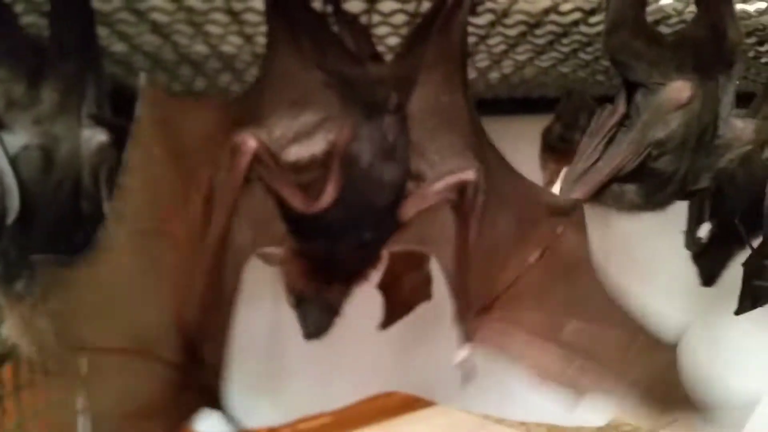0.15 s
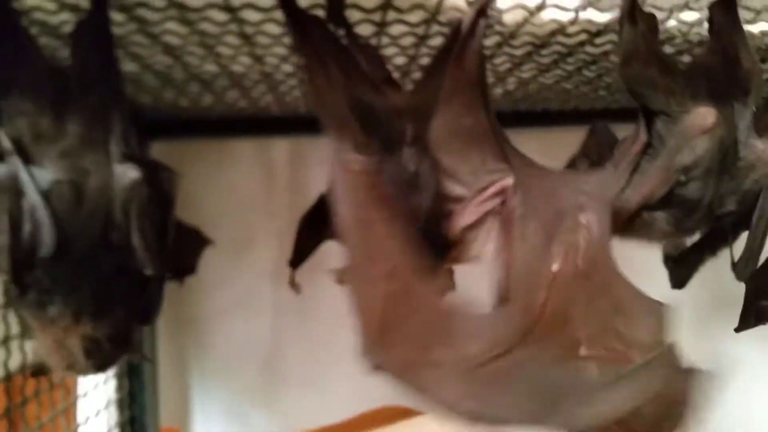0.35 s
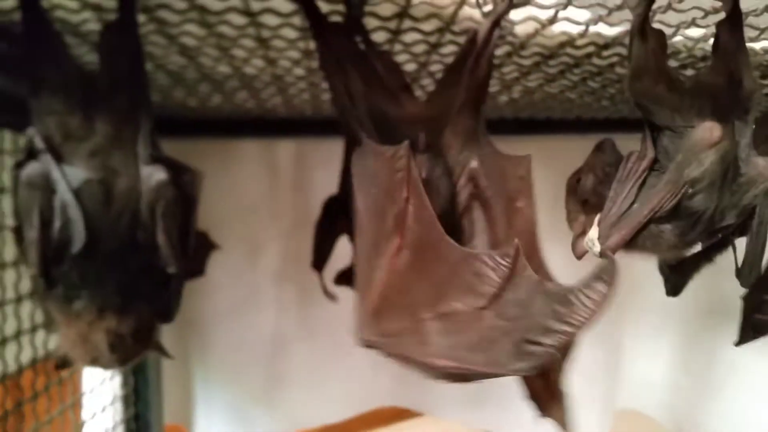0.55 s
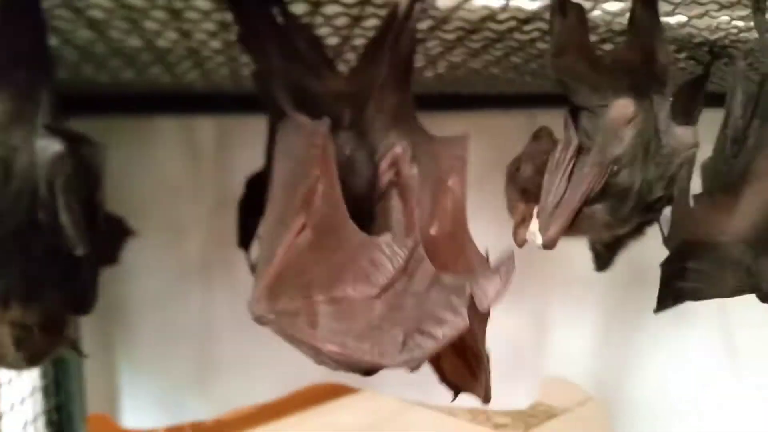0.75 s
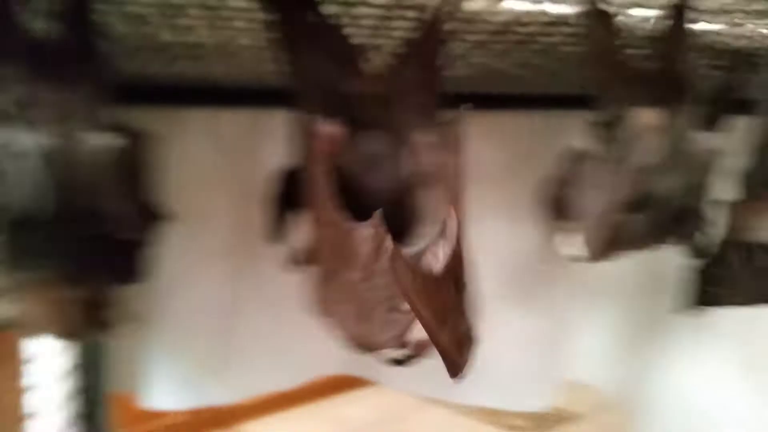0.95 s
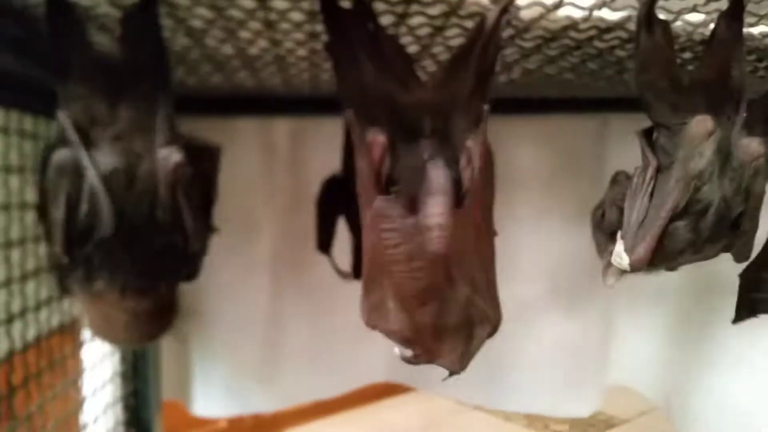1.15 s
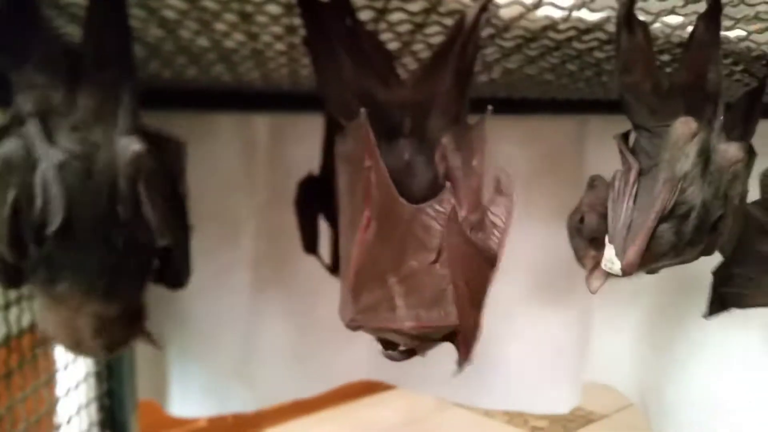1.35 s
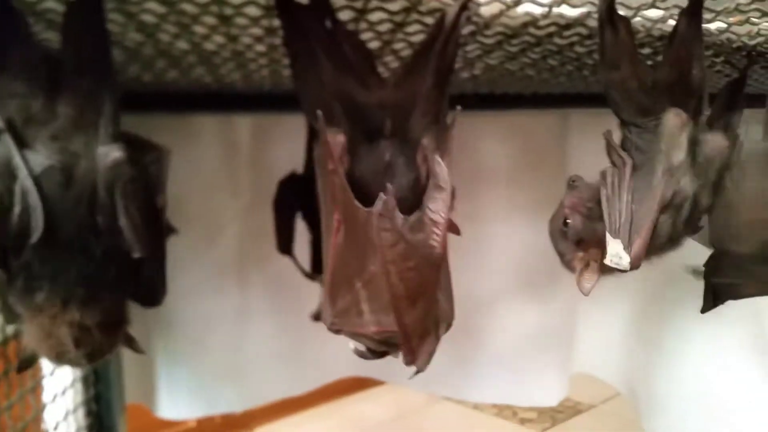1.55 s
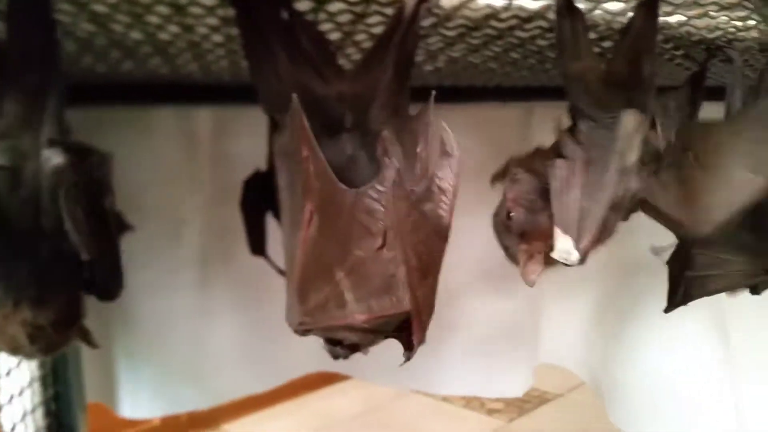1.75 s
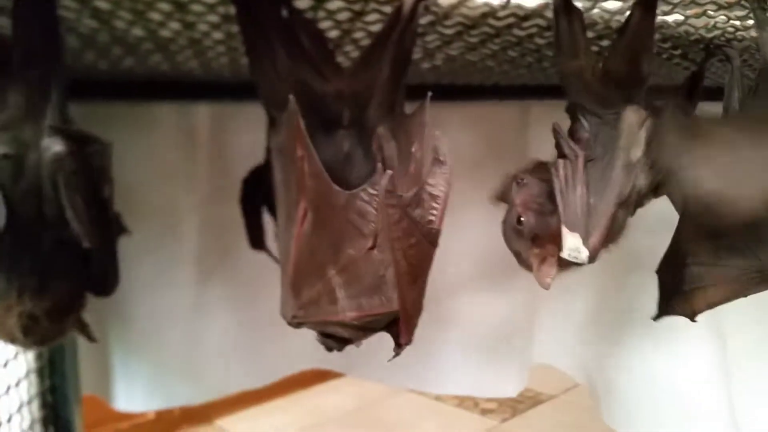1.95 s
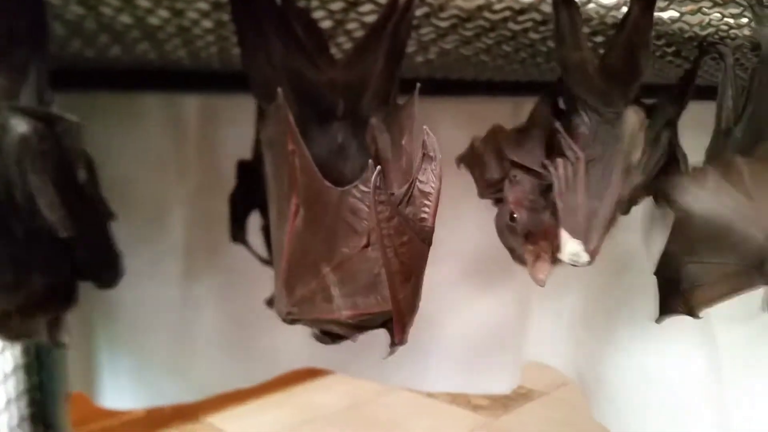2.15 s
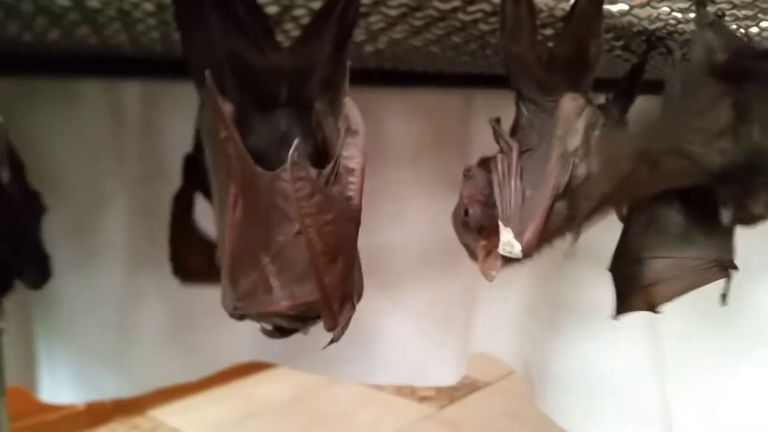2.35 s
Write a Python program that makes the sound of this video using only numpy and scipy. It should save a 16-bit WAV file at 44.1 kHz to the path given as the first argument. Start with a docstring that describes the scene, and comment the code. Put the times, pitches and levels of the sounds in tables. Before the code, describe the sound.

Fruit bats screech in rapid, harsh, high-pitched syllables from about 0.2 to 0.8 seconds. Shorter bursts come near 1.0 and 1.3 seconds. A wing swishes through the latter and snaps at 1.5 seconds, and the wire cage rings faintly. Another fast run of chatter lasts from 1.7 to 2.2 seconds, then one tiny chirp at 2.4. Quiet ventilation hums throughout in the small, hard-walled enclosure.

```python
"""Fruit bats squabble under the mesh roof of a small, hard-walled enclosure; ventilation hums throughout.
At 0.23, 1.01 and 1.34 s a dry rasp opens a bout of screeching: rough, fast vocal-fold pulses through
two throat resonances near 6 and 11 kHz that arch as the mouth opens. A wing swishes through the third
bout and snaps at 1.49 s; the cage rings faintly. A fourth bout runs from 1.7 to 2.2 s at about
21 syllables a second. One short chirp follows at 2.38 s."""
import sys
import numpy as np
from scipy import signal
from scipy.fft import rfft, irfft
from scipy.io import wavfile

SR = 44100
rng = np.random.default_rng(int(sys.argv[2]) if len(sys.argv) > 2 else 0)


def int16_out(signal):
    """Quantize to a 16-bit WAV file."""
    q = np.round(np.clip(np.atleast_2d(signal).T, -1, 1) * 32767)
    wavfile.write(sys.argv[1], SR, q.astype(np.int16))


N = 105840
BAND_EDGE_HZ = 16150
SNAP_S = 1.493


def amp(db):
    """Decibels to gain."""
    return 10 ** (np.asarray(db) / 20)


def unit(x):
    """Scale to rms 1."""
    return x / np.sqrt(np.mean(x ** 2) + 1e-20)


def lookup(points, hz):
    """Interpolate a table on a log-frequency axis."""
    points_hz, values = np.transpose(points)
    return np.interp(np.log(hz + 1), np.log(points_hz + 1), values)


def colour(x, spectrum):
    """Filter by a spectrum table; output rms 1."""
    gain = amp(lookup(spectrum, np.fft.rfftfreq(x.shape[-1], 1 / SR)))
    return unit(irfft(rfft(x) * gain, x.shape[-1]))


def noise(size):
    """White noise."""
    return np.random.default_rng(rng.integers(1 << 30)).standard_normal(size)


def wander(size, cutoff_hz):
    """Low-passed random drift, rms about 1."""
    span = max(size, 8192)
    rolloff = 1 + (np.fft.rfftfreq(span, 1 / SR) / cutoff_hz) ** 4
    return unit(irfft(rfft(noise(span)) / rolloff, span))[:size]


def formant(x, centre_hz, width_hz):
    """Two moving resonators in series, then a high-pass; output rms 1."""
    carrier = np.exp(2j * np.pi * np.cumsum(centre_hz) / SR)
    pole = np.exp(-np.pi * width_hz / SR)
    for _ in range(2):
        x = 2 * (carrier * signal.lfilter([1 - pole], [1, -pole], x / carrier)).real
    highpass = signal.butter(2, 0.5 * np.min(centre_hz), "high", fs=SR, output="sos")
    return unit(signal.sosfilt(highpass, x))


def place(mix, start_s, sound, pan_db):
    """Add a call with time and level differences between channels; positive pan is left."""
    # caller directions: from_s, left_lead_ms
    directions = [(0, -0.43), (.95, 0.42), (1.65, -0.052)]
    lead_ms = directions[sum(start_s > from_s for from_s, _ in directions[1:])][1]
    for channel, side in zip(mix, (1, -1)):
        onset = round((start_s - side * lead_ms / 2000) * SR)
        part = channel[onset:onset + len(sound)]
        part += amp(side * pan_db / 2) * sound[:len(part)]


def ventilation():
    """Steady rush of air with faint, wavering motor tones."""
    # air spectrum: freq_hz, gain_db
    air_spectrum = [(20, -16), (45, -5), (100, -2), (200, -1), (300, -4), (450, -9), (600, -2), (820, -8),
                    (1100, -16), (1700, -15), (2400, -16), (3200, -24), (4400, -29), (6500, -35),
                    (11000, -39), (16000, -40)]
    # left-right likeness of the air: freq_hz, coherence
    air_coherence = [(40, 1), (150, 0.91), (350, 0.93), (700, 0.74), (1300, 0.28), (16000, .1)]
    # motor tones: pitch_hz, level_db
    motor_tones = [(100, -64.5), (199.5, -65.5), (614, -69.5), (795.5, -62)]
    left, independent = rfft(rng.standard_normal((2, N)))
    coherence = lookup(air_coherence, np.fft.rfftfreq(N, 1 / SR))
    right = coherence * left + np.sqrt(1 - coherence ** 2) * independent
    rush = colour(irfft(np.array([left, right]), N), air_spectrum)
    hum = np.zeros(N)
    for pitch_hz, level_db in motor_tones:
        phase = 2 * np.pi * np.cumsum(pitch_hz + 0.71 * wander(N, 7.6)) / SR
        hum += amp(level_db) * unit(np.sin(phase) * (1 + 0.1 * wander(N, 1.7)))
    return amp(-48) * rush + hum


def room(x):
    """Near reflections from mesh roof and wall, then a diffuse tail."""
    # reverberation time: freq_hz, t60_s
    decay_times = [(300, 0.18), (3000, 0.52), (6000, 0.31), (10000, 0.33), (15000, 0.17)]
    size, build_s, echo_count = SR // 2, 0.0032, 24
    hz, t, bins = signal.stft(rng.standard_normal((4, size)), SR, nperseg=256)
    decay = amp(-60 * t / lookup(decay_times, hz)[:, None])
    tails = signal.istft(bins * decay * (1 - np.exp(-t / build_s)), SR, nperseg=256)[1]
    tails /= np.linalg.norm(tails, axis=1, keepdims=True)
    echoes = np.zeros((2, size))
    for channel in echoes:
        signs = rng.choice([-1, 1], size=echo_count)
        delays_s = rng.uniform(0.0005, 0.008, size=echo_count)
        channel[(SR * delays_s).astype(int)] = signs / np.sqrt(echo_count)
    early = signal.fftconvolve(x, echoes, axes=1)[:, :N]
    same_side = signal.fftconvolve(x, tails[:2], axes=1)[:, :N]
    crossed = signal.fftconvolve(x[::-1], tails[2:], axes=1)[:, :N]
    return early + amp(1) * (same_side + 0.29 * crossed)


def cage():
    """The wire cage rings faintly as the wing snaps."""
    # wire modes: freq_hz, level_db, t60_s
    modes = [(955, -31, 0.11), (1200, -43.5, 0.18), (1640, -31.5, 0.044), (2590, -51, 0.3)]
    t = np.maximum(np.arange(N) / SR - SNAP_S, 0)
    return sum(amp(db - 60 * t / t60_s) * np.sin(2 * np.pi * hz * t) for hz, db, t60_s in modes)


def wing():
    """A swish falling in pitch, and the snap of the membrane pulling taut."""
    # swish path: time_s, centre_hz, level_db
    swish_path = [(1.26, 4120, -94), (1.312, 3050, -42), (1.36, 2530, -42), (1.401, 2150, -40.5),
                  (1.46, 1680, -42.5), (1.50, 1270, -49), (1.56, 940, -92), (1.64, 769, -83)]
    # membrane snap: freq_hz, gain_db
    snap_spectrum = [(40, -26), (250, -1), (600, 9), (1000, -6), (1600, -7), (2700, -12), (4000, -12),
                     (9000, -26)]
    snap_decay_s = 0.0034
    t = np.arange(N) / SR
    time_s, centre_hz, level_db = np.transpose(swish_path)
    glide_hz = np.interp(t, time_s, centre_hz)
    envelope = amp(np.interp(t, time_s, level_db, left=-120, right=-120))
    swish = np.array([formant(noise(N), glide_hz, width_hz=2400) for _ in range(2)])
    snap = colour(noise(N), snap_spectrum) * (t > SNAP_S) * np.exp(-abs(t - SNAP_S) / snap_decay_s)
    return envelope * swish + amp(-26) * snap


def effort_arch(length_s):
    """Vocal effort: 0 to 1 and back, peaking early."""
    progress = np.arange(0, length_s, 1 / SR) / length_s
    return abs(np.sin(np.pi * progress ** 0.72))


def vocal_folds(effort, pulse_hz):
    """Uneven pulses, each with a puff of air; the rate sags at low effort."""
    sag, jitter, shimmer_db = 0.04, 0.0268, 2
    air_share, puff_cycles = 0.53, 0.12
    size = len(effort)
    rate_hz = pulse_hz * (1 - sag * (1 - effort) + jitter * wander(size, 415))
    cycles = np.cumsum(rate_hz) / SR
    clicks = sum(np.cos(2 * np.pi * k * cycles) for k in range(1, int(BAND_EDGE_HZ / pulse_hz) + 1))
    puffs = np.exp(-(cycles % 1) / puff_cycles) * noise(size)
    pulses = (1 - air_share) * unit(clicks) + air_share * unit(puffs)
    return pulses * amp(shimmer_db * wander(size, 680))


def rasp(length_s, pulse_hz, level_db):
    """Dry pulses through a half-shut mouth, peaking late."""
    # half-shut mouth: freq_hz, gain_db
    mouth_spectrum = [(100, -70), (900, -13), (2500, -19), (4000, -4), (5200, 0.5), (6200, 9.5), (7100, -2),
                      (8400, 6.5), (10000, 1.5), (11500, -7.5), (15500, -6.5)]
    effort = effort_arch(length_s)[::-1]
    return amp(level_db) * effort ** 1.32 * colour(vocal_folds(effort, pulse_hz), mouth_spectrum)


def syllable(length_s, pulse_hz, lower_hz, upper_hz, lower_db, upper_db, rattle_db, hoarse_db):
    """Pulses ring two throat resonances that glide up and sag, over a broad, sometimes hoarse rattle."""
    # broad throat response: freq_hz, gain_db
    throat_spectrum = [(100, -73), (900, -33), (2000, -15.5), (3200, -21), (4000, -14.5), (4700, -2.5),
                       (5500, 9.5), (6400, 0.5), (7400, 2.5), (8500, -0.5), (10400, -5.5), (12500, 1.5),
                       (14000, 3), (15500, -3), (16500, -40)]
    # low, hoarse throat resonance: freq_hz, gain_db
    hoarse_spectrum = [(100, -64), (1500, -32.5), (2500, -11.5), (3100, -6.5), (3900, 2.5), (4700, -5),
                       (7000, -12)]
    effort = effort_arch(length_s)
    pulses = vocal_folds(effort, pulse_hz)
    opening = np.arange(len(effort)) < np.argmax(effort)
    closure = (1 - effort) * np.where(opening, 1, 0.6)  # the mouth recloses only partly
    lower = formant(pulses, lower_hz * (1 - 0.23 * closure), width_hz=560)
    upper = formant(pulses, upper_hz * (1 - 0.34 * closure), width_hz=1600)
    rattle = colour(pulses, throat_spectrum) + amp(hoarse_db) * colour(pulses, hoarse_spectrum)
    body = effort ** 0.68 * (amp(lower_db) * lower + amp(rattle_db) * rattle)
    return body + effort ** 0.18 * amp(upper_db) * upper  # upper sounds early, still gliding up


def bats():
    """Four bouts of screeched syllables; a rasp opens each of the first three."""
    # screeches: start_s, length_s, pulse_hz, lower_hz, upper_hz, lower_db, upper_db, rattle_db, pan_db
    syllables = [ (0.27, 0.027, 787.4, 6500, 10500, -25.5, -27, -24, 1),
                 (0.314, 0.04, 727, 5900, 12700, -24, -32, -27.5, 1),
                 (0.371, 0.029, 410, 5440, 11500, -36, -35, -27.5, 0),
                 (0.422, 0.038, 744, 6210, 12640, -27.5, -27, -43, -9.5),
                 (0.465, 0.045, 680, 6360, 12300, -29, -30.5, -31, -1.5),
                 (0.514, 0.033, 673, 6470, 12450, -26, -28, -33, -5.5),
                 (0.556, 0.046, 675.7, 6660, 12240, -33.5, -32.5, -35, -9),
                 (0.604, 0.038, 690, 6540, 12100, -25.5, -27, -30, -2.5),
                 (0.65, 0.043, 687.4, 6340, 11800, -29.5, -29.5, -33.5, -5.5),
                 (0.681, 0.038, 1004, 6460, 10900, -27, -27.5, -27, 0.5),
                 (0.719, 0.021, 702, 6570, 12500, -29.5, -29, -33, -11),
                 (0.739, .028, 450.5, 6100, 11500, -29, -30, -26, 5),
                 (.768, .034, 448.7, 6270, 11800, -34.5, -32.5, -27.5, -6),
                 (1.056, 0.0298, 718, 6480, 11000, -23, -22, -23, 1.5),
                 (1.102, 0.031, 362, 5800, 13100, -35, -33, -25, 1),
                 (1.164, 0.0088, 885, 5250, 11600, -37, -37, -37, -6),
                 (1.3, 0.013, 930, 4940, 7500, -50, -55, -63, 4),
                 (1.383, 0.036, 1080, 6550, 11400, -24, -22.5, -23, 0.5),
                 (1.441, 0.036, 978, 5620, 12200, -27, -32, -21, 1.5),
                 (1.476, 0.014, 1020, 6000, 15200, -50, -32, -51, 1),
                 (1.493, 0.0021, 846, 5600, 10200, -58, -62, -48, -15),
                 (1.688, 0.024, 690, 6030, 10900, -73, -57, -53, -16),
                 (1.707, 0.02, 711, 6300, 10900, -66, -38.5, -31, 1),
                 (1.741, .036, 699, 5960, 12400, -32.5, -26.5, -29.5, -7),
                 (1.785, 0.038, 681, 6410, 11400, -28, -27.5, -28, -2),
                 (1.829, 0.038, 723, 7430, 12400, -31, -30.5, -32.5, -5),
                 (1.876, 0.046, 683, 6560, 10650, -33, -32.5, -35, -4.5),
                 (1.922, .038, 710, 6900, 10760, -32, -30.5, -30.5, -3),
                 (1.971, 0.0464, 720, 6800, 11440, -34, -29, -31.5, -4),
                 (2.019, 0.042, 746, 6580, 11460, -31.5, -27, -31, -4),
                 (2.066, 0.048, 767, 6100, 11200, -36.5, -29.5, -31.5, -5),
                 (2.126, 0.064, 593, 5600, 10700, -45.5, -46.5, -36, -1.5),
                 (2.375, 0.0059, 894, 5700, 9540, -31, -35, -46, 6)]
    # hoarse resonance relative to the broad rattle: time_s, level_db
    hoarseness = [(.27, -10), (.38, -2), (.44, -18), (.52, -29), (.65, -18), (.69, -9), (.75, -16),
                  (1.06, -15), (1.44, -15.5), (1.74, -23), (2.38, -22)]
    # opening rasps: start_s, length_s, pulse_hz, level_db, pan_db
    rasps = [(.227, 0.016, 838, -17.5, 0), (1.013, 0.014, 1422, -19, 1), (1.339, 0.03, 1103, -23, 2.5)]
    mix = np.zeros((2, N))
    for start_s, *shape, pan_db in syllables:
        hoarse_db = np.interp(start_s, *np.transpose(hoarseness))
        place(mix, start_s, syllable(*shape, hoarse_db), pan_db)
    for start_s, *shape, pan_db in rasps:
        place(mix, start_s, rasp(*shape), pan_db)
    return mix


def scene():
    """Bats, wing and cage in the room, over the ventilation."""
    direct = bats() + wing() + cage()
    return amp(-7.5) * (direct + room(direct)) + ventilation()


def record(dry):
    """Steep low-pass at the band edge."""
    lowpass = signal.firwin(511, BAND_EDGE_HZ, window=("kaiser", 9), fs=SR)
    return signal.oaconvolve(dry, lowpass[None], "same")


dry = scene()
out = record(dry)
int16_out(out)
```